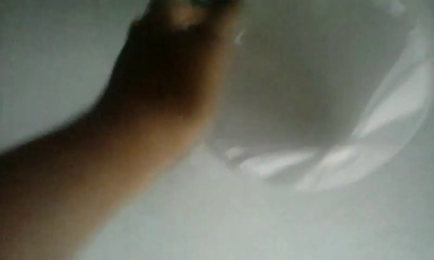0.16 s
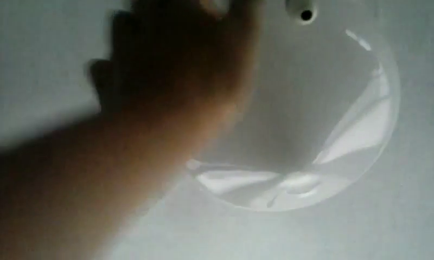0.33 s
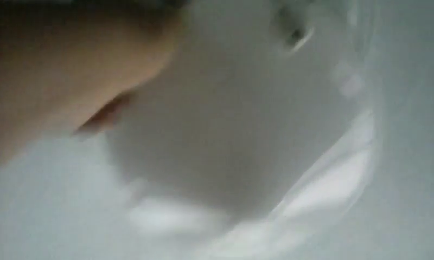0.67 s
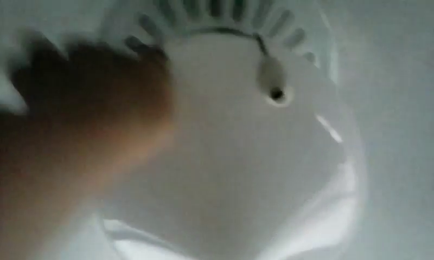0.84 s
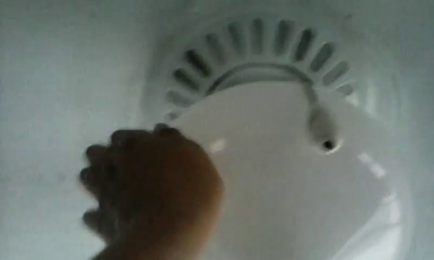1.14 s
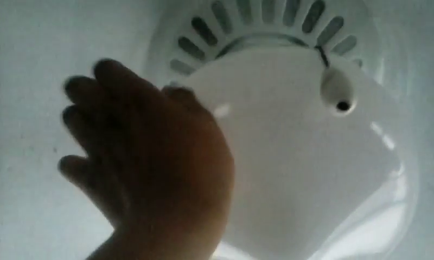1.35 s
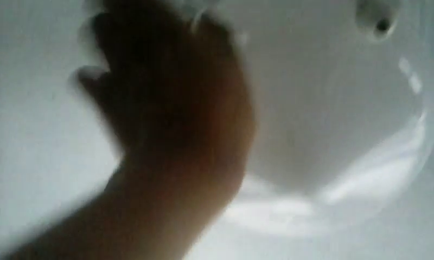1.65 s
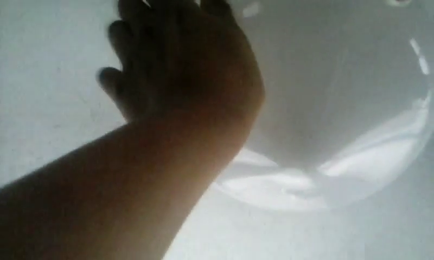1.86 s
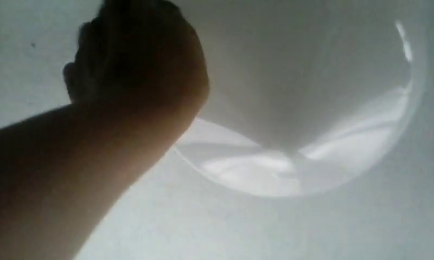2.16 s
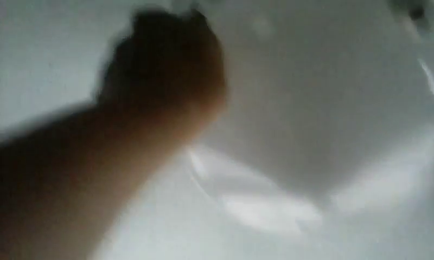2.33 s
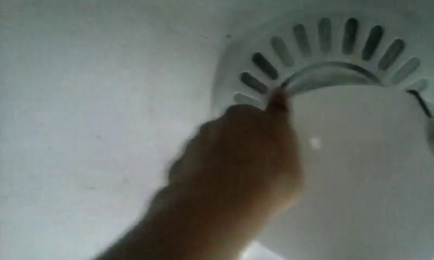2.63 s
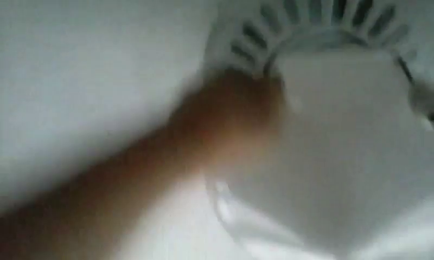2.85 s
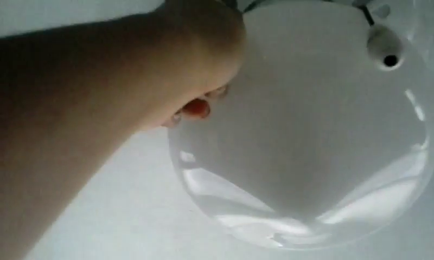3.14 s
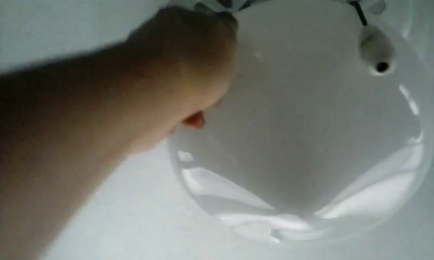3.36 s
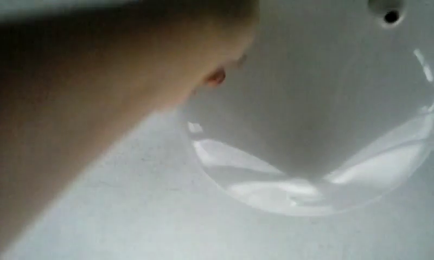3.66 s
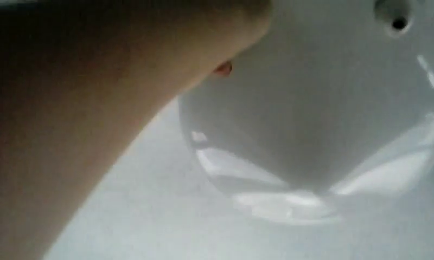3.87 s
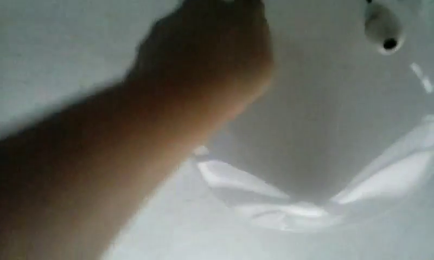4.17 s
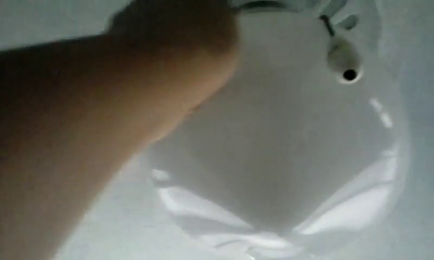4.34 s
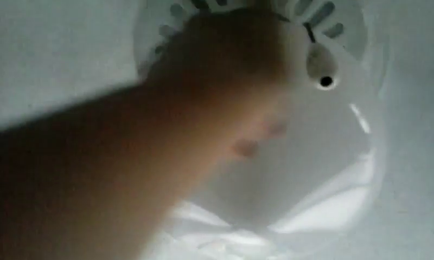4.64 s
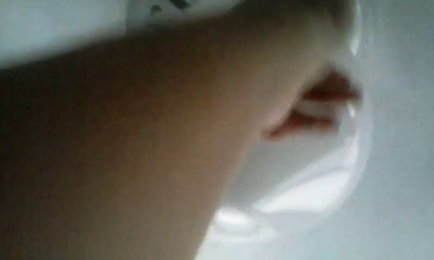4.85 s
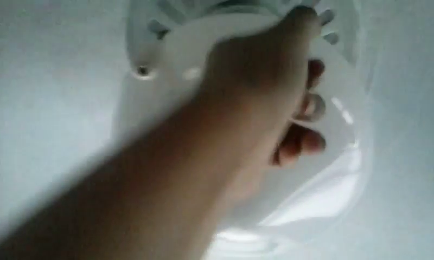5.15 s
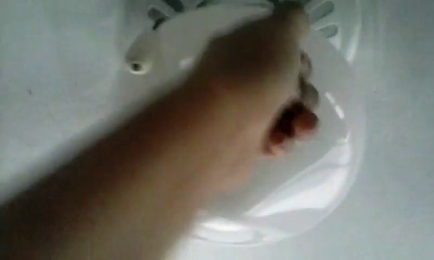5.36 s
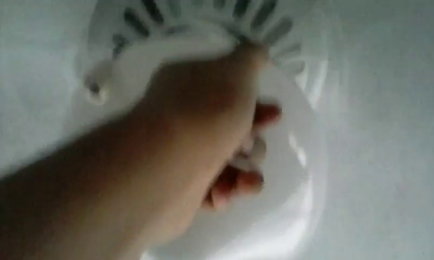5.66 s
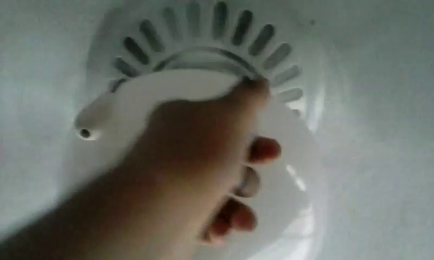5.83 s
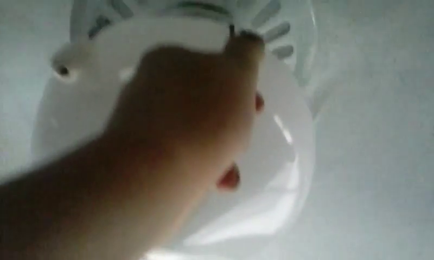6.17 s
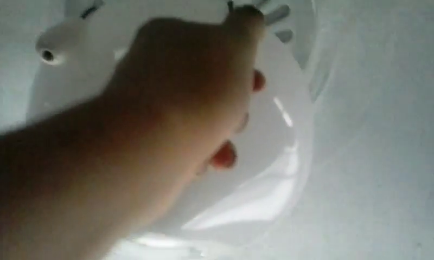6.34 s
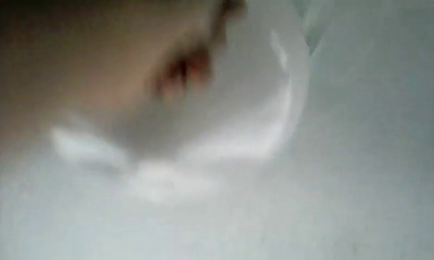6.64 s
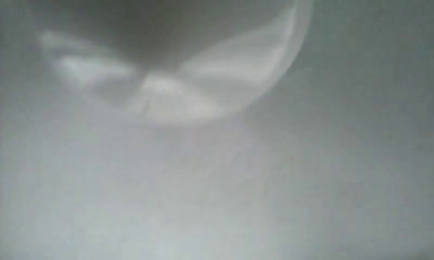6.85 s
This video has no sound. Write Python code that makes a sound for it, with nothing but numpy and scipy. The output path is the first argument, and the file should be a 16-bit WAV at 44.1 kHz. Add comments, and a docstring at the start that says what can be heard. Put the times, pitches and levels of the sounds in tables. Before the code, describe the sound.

Shrill clinks and clicks come as a hand tugs bead chains against a glass light globe, jolting the ceiling fan, which hums briefly.

```python
"""In a small room, a hand works the pull chains of a ceiling fan light. Pendants clink on the glass globe and
the switch clicks in its metal cup: each impact is a crack followed by the free vibration of the body struck,
and the blows and the bead hiss are shrill around 8 kHz. The pulls jolt the housing into a low shudder, the bead
chains rustle and squeak on the glass, and the motor hums for a moment while it has power. Under it all lie a
soft, wavering background noise and a low rumble."""
import sys
import numpy as np
from scipy import signal
from scipy.fft import rfft, irfft
from scipy.io import wavfile

SR = 44100
rng = np.random.default_rng(int(sys.argv[2]) if len(sys.argv) > 2 else 0)


def wrap_up_sound(samples):
    """Save the sound to the file named by the first command line argument, as 16-bit audio."""
    columns = np.atleast_2d(samples).T
    # keep every value between -1 and 1, then stretch to whole-number steps
    tamed = np.clip(columns, -1, 1)
    steps = np.round(tamed * 32767).astype(np.int16)
    wavfile.write(sys.argv[1], SR, steps)


N = 308700
TIME = np.arange(N) / SR
SIZE = 32768   # samples in one impact and its decay
AGE = np.arange(SIZE) / SR   # time since the impact [s]
FREQ = np.maximum(np.fft.rfftfreq(SIZE, 1 / SR), 1)


def globe_clinks():
    """Impact excitation: pendants and chain strike the globe and ring its lightly damped glass modes."""
    # impacts: (time [s], level [dB], extra crack [dB], weight [dB], hardness [dB])
    hits = [(0.5065, -8.5, 0, -5.5, -34), (0.559, -18, -12, -1, -10), (0.576, -25, 9.5, 11.5, -22),
            (0.7355, -26, 6, 0.5, -10), (0.954, -43, 0, -12, -23), (0.971, -30, -7, -4, -32),
            (0.99, -32.5, -8, -8, -12), (1.288, -40.5, 7, -11, -28), (1.768, -26, -12, -2, -16),
            (2.397, -32.5, 7, -14.5, -17), (2.58, -48.5, 13, -3, 0), (3.491, -22.5, -16, 19, -11.5),
            (3.875, -17.5, 8, -6, -18.5), (4.065, -36.5, -5, 7.5, -5), (4.683, -32, -3, 7.5, -10),
            (4.719, -25, 2.5, 3, -16.5), (5.032, -30.5, -17, 4.5, -16), (6.006, -39, 1, -23, -10)]
    # modes of the globe: (frequency [Hz], level [dB], t60 [s])
    glass_modes = [(2428, -5, .75), (2644, -17, .35), (3080, -1, .32), (3390, -9, .22), (3472, -5, .28),
                   (4790, -11, .22), (5550, -6, .22), (5669, -6, .2), (6126, -6, .19), (6611, -3, .24),
                   (6799, -4, .23), (7197, -1, .2), (7440, 0, .22), (7648, -2, .3), (7916, -3, .32),
                   (8148, -1, .24), (8335, -3, .22), (8590, -2, .2), (8952, 0, .22), (9453, -2, .25),
                   (10100, -2, .22), (10720, -1, .2), (11400, -3, .2), (12210, -3, .2)]
    # bands under 6.8 kHz, low to high: (level re the 8 kHz band [dB], gain with weight [dB/dB])
    low_bands = [(-37.5, 1.3), (-23.5, 1.0), (-12.5, 0.69)]
    return impacts(hits, glass_modes, low_bands, crack_db=15, ring_db=23, modes_db=1,
                   crack_t60=0.014, ripple_db=4, spread_db=6, grain_db=2.5)


def switch_clicks():
    """Impact excitation: the ratchet and the chain snapping through its guide ring the metal switch cup."""
    # impacts: (time [s], level [dB], extra crack [dB], weight [dB], hardness [dB])
    hits = [(1.886, -26.5, -1.5, 0, -7), (2.797, -28, -5, -1, -21), (2.8252, -20.5, -2, 4.5, -16),
            (2.839, -14.5, -3.5, 4.5, -15), (2.918, -25, -0.5, -1.5, -11.5), (2.969, -21, 3, 1, -25),
            (3.057, -23.5, 2, -1.5, -18.5), (3.103, -23.5, -0.5, 0.5, -26), (3.1655, -14.5, 1.5, 1.5, -7.5),
            (3.527, -21, -2, 6, -22), (3.5435, -15, 2, 1.5, -17.5), (3.662, -25.5, 2, -2, -24),
            (3.675, -31.5, 5.5, -0.5, -14), (3.711, -32, 9, -5, -40), (3.7225, -15, -16, 0, -23),
            (3.751, -26.5, -2.5, -4, -21), (3.781, -15.5, 2.5, -0.5, -6.5), (4.095, -20, -1, -0.5, -35),
            (4.111, -22.5, -4, 8.5, -6.5), (4.126, -15.5, 1.5, 4, -17.5), (4.2605, -29.5, 4, -17, -26),
            (4.3295, -21.5, -0.5, -3, -22), (4.375, -21, 1, -3.5, -22), (4.4485, -17, 3, -0.5, -14.5),
            (4.549, -30, 0, -7.5, -29), (4.5935, -41.5, -5, 4, -3.5), (5.35, -20, -1.5, -5, -14),
            (5.372, -10.5, 1, -6, -19.5), (5.636, -23.5, 0, -3.5, -6), (5.67, -20, 2.5, -2, -9)]
    # modes of the cup: (frequency [Hz], level [dB], t60 [s])
    cup_modes = [(732, -5, .22), (1620, -5, .18), (1800, -2, .24), (1900, -4, .18), (2213, -4, .26),
                 (2460, -8, .2), (2644, -7, .2), (2750, -7, .2), (3074, -4, .25), (3390, -4, .2),
                 (3910, -4, .22), (4100, -5, .18), (4440, -3, .14), (4750, -5, .18), (5148, -5, .2),
                 (5390, -4, .2), (5544, 0, .22), (5675, -3, .22), (6525, -3, .22), (6799, 2, .23),
                 (7203, -3, .2), (7433, -2, .2), (7650, -2, .2), (7914, -1, .24), (8143, -1, .22),
                 (8335, -3, .2), (8619, -3, .12), (9300, -3, .16), (10500, -4, .16), (12200, -2, .2)]
    # bands under 6.8 kHz, low to high: (level re the 8 kHz band [dB], gain with weight [dB/dB])
    low_bands = [(-20.5, 1.28), (-14, 0.74), (-6.5, 0.32)]
    return impacts(hits, cup_modes, low_bands, crack_db=23, ring_db=24.5, modes_db=-7,
                   crack_t60=0.042, ripple_db=4.5, spread_db=6.5, grain_db=0.56)


def impacts(hits, body_modes, low_bands, crack_db, ring_db, modes_db, crack_t60,
            ripple_db, spread_db, grain_db, detune=0.0013, split=0.00462):
    """Superposition of crack, damped modes and reverberation; weight lifts the lows, hardness the top."""
    out = np.zeros(N)
    modes = np.array([from_db(db) * np.exp(2j * np.pi * hz * AGE) * decay(t60)
                      for hz, db, t60 in body_modes])
    for s, db, snap_db, weight, hardness in hits:
        # where the body is struck decides how strongly each mode answers
        strengths = from_db(rng.normal(0, spread_db, len(modes)))
        phases = np.exp(2j * np.pi * rng.random(len(modes)))
        ringing = (strengths * phases) @ modes
        # a round shell has twin modes; the changing grip splits them, so they beat
        twins = unit(detuned(ringing.real, detune) + detuned(ringing.imag, split))
        tail = unit(room_tail(grain_db) + from_db(modes_db) * twins)
        blow = from_db(db) * (from_db(crack_db + snap_db) * crack(crack_t60) + from_db(ring_db) * tail)
        band_db = np.array([0, *(usual + slope * weight for usual, slope in low_bands), hardness])
        add(out, s, irfft(rfft(blow) * contact_filter(band_db, ripple_db)))
    return out


def crack(t60, rise_s=0.0004, snap=1.44, snap_t60=0.002):
    """Contact transient: a snap, then a brief chatter of beads on metal."""
    envelope = (decay(t60) + snap * decay(snap_t60)) * rise(rise_s)
    return unit(chatter(grain_db=-1) * envelope)


def contact_filter(band_db, ripple_db):
    """Spectral shaping: a contact's spectrum, rippled by the spot struck, is bent to a level per band."""
    # the 8 kHz band, then the others from low to high: (lower edge [Hz], upper edge [Hz])
    bands = [(6800, 9500), (600, 2200), (2200, 5000), (5000, 6800), (10000, 15800)]
    # spectrum common to every contact: (frequency [Hz], spectral density [dB])
    contact_spectrum = [(150, -40.5), (450, -22), (720, -11.5), (950, -23), (1700, -15.5), (3200, -16),
                        (4700, -16), (5700, -12), (7000, -3.5), (8100, 3.5), (8800, -4.5), (10500, -12),
                        (13000, -18), (16000, -18)]
    centres = np.sqrt(np.prod(bands, axis=1))
    ripple_hz = np.linspace(0, SR / 2, 110)
    ripple = np.interp(FREQ, ripple_hz, rng.standard_normal(len(ripple_hz)))
    shape_db = at_hz(contact_spectrum, FREQ) + ripple_db * ripple
    for _ in range(2):
        power = 10 ** (shape_db / 10) / len(FREQ)
        band_power = np.array([power[(FREQ > low) & (FREQ < high)].sum() for low, high in bands])
        shortfall_db = band_db - 10 * np.log10(band_power)
        shape_db = shape_db + at_hz(sorted(zip(centres, shortfall_db)), FREQ)
    return minimum_phase(shape_db)


def fixture_pings(split_hz=21, rise_s=0.002, wet=0.54):
    """Beating: the spot struck favours a range of partials, and each interferes with a close twin."""
    # blows: (time [s], level [dB], favoured frequency [Hz], reach around it [Hz])
    blows = [(0.5074, -51, 3340, 700), (0.575, -40, 3130, 560), (0.7361, -49, 2970, 650),
             (1.77, -53.5, 3000, 700), (1.886, -41.5, 2200, 110), (2.969, -37, 3470, 90),
             (3.1675, -29, 3920, 150), (3.491, -29, 3390, 90), (3.675, -37, 3400, 90),
             (3.875, -41, 3310, 90), (4.717, -55, 2750, 180), (5.034, -56.5, 2950, 200),
             (5.372, -35, 2250, 80), (5.636, -38, 4400, 200), (5.67, -41, 2260, 80)]
    # partials of the fixture: (frequency [Hz], level [dB], t60 [s])
    partials = [(2280, -4, .19), (2330, -4, 0.2), (2420, 4, 0.42), (2675, -6.5, .14), (3050, 2.5, 0.18),
                (3391, 5, 0.1), (3510, -3.5, 0.21), (3914, -3, 0.13), (4340, -2.5, 0.28)]
    out = np.zeros(N)
    for s, db, favoured_hz, reach_hz in blows:
        tone = 0
        for hz, partial_db, t60 in partials:
            twin = np.sin(2 * np.pi * ((hz + split_hz) * AGE + rng.random()))
            pair = np.sin(2 * np.pi * hz * AGE) + twin
            tone += from_db(db + partial_db) * gaussian(hz, favoured_hz, reach_hz) * pair * decay(t60)
        add(out, s, in_room(tone * rise(rise_s), wet))
    return out


def housing_jolts(cycles_to_peak=4.28, shake=0.39, rattle_db=-20, shell_rise_s=0.027):
    """Damped oscillation: the hanging body shudders, its shell rings, loose parts rattle on each swing."""
    # jolts: (time [s], level [dB], shudder frequency [Hz], shell gain [dB])
    jolts = [(1.893, -44, 94.3, -1), (2.829, -29, 102.3, 4), (2.961, -40.5, 75.7, 9),
             (3.528, -29.5, 107, 5), (3.682, -41.5, 77, 6), (4.101, -29, 98, 4.5), (4.252, -45, 77.7, 4.5),
             (5.352, -36, 94.3, 12), (5.525, -46, 85.5, 3.5), (5.656, -52.5, 84.4, 17.5),
             (5.971, -48, 84, -1)]
    # modes of the shell: (frequency [Hz], relative level [dB], t60 [s])
    shell_modes = [(142, -13.5, 0.17), (221.9, -6.5, 0.26), (233, -20, 0.35), (441, -33, 0.04),
                   (786, -23.5, 0.34)]
    out = np.zeros(N)
    for s, db, shudder_hz, shell_db in jolts:
        peak_s = cycles_to_peak / shudder_hz
        swell = (AGE / peak_s) ** 2 * np.exp(2 * (1 - AGE / peak_s))
        shudder = np.sqrt(2) * np.sin(2 * np.pi * shudder_hz * AGE)
        wobble = in_band(rng.standard_normal(SIZE), 63, 165)
        rattle = in_band(chatter(grain_db=10) * np.maximum(shudder, 0), 550, 5000)
        shell = sum(from_db(level + shell_db) * np.sin(2 * np.pi * (hz * AGE + rng.random())) * decay(t60)
                    for hz, level, t60 in shell_modes)
        swinging = shudder + shake * wobble + from_db(rattle_db) * rattle * decay(t60=0.53)
        add(out, s, from_db(db) * (swell * swinging + 2 * shell * rise(shell_rise_s)))
    return out


def hand_knocks(wet=0.39):
    """Heavy damping: each soft blow of the hand on the fixture rings a broad resonance for a few cycles."""
    # knocks: (time [s], level [dB], frequency [Hz], bandwidth [Hz])
    knocks = [(1.888, -36, 1160, 348), (5.37, -26.5, 446, 111), (5.369, -27.5, 1150, 300),
              (5.637, -41.5, 840, 150), (5.673, -45.5, 1110, 400), (5.942, -41.5, 1020, 397)]
    out = np.zeros(N)
    for s, db, hz, width_hz in knocks:
        time_constants = np.pi * width_hz * AGE
        envelope = time_constants * np.exp(1 - time_constants)
        pulse = from_db(db) * envelope * np.sin(2 * np.pi * hz * AGE)
        add(out, s, in_room(pulse, wet))
    return out


def glass_squeaks():
    """Friction: skin and beads rub the glass, each rub a swell of noise in one narrow resonance."""
    # rubs: (time [s], level [dB], half-width [s], frequency [Hz], bandwidth [Hz])
    rubs = [(0.102, -64.5, 0.058, 1880, 400), (0.735, -45.5, .007, 3080, 200), (2.33, -63, 0.022, 2973, 70),
            (2.643, -71, 0.023, 1900, 600), (6.957, -67.5, 0.043, 2446, 61)]
    out = np.zeros(N)
    for s, db, width_s, hz, width_hz in rubs:
        resonance = in_band(rng.standard_normal(N), hz - width_hz / 2, hz + width_hz / 2)
        out += from_db(db) * gaussian(TIME, s, width_s) * resonance
    return out


def chain_rustle(ticks_per_s=260, spread_db=5, hiss=0.84, beads_db=3, singing_db=-16, rubbing_db=4):
    """Shot noise: random bead collisions blur into a hiss; friction scrapes the rim and rings the globe."""
    # stirring of the hanging chains: (time [s], relative level [dB])
    stirring = [(0, -57.5), (1.1, -56.5), (1.5, -63), (2.05, -55), (2.35, -65), (2.55, -56), (3.4, -63),
                (4.9, -58.5), (5.2, -65), (5.7, -72), (6.35, -69), (6.7, -62), (7, -68.5)]
    # slides through the fingers: (time [s], relative hiss [dB], half-width [s], relative singing [dB])
    slides = [(.15, -73, 0.023, -77), (0.417, -50.5, .022, -85), (1.25, -54.5, .012, -78),
              (1.377, -53.5, 0.029, -69), (1.571, -51.5, 0.022, -72), (2.138, -58, 0.048, -76),
              (2.688, -58.5, 0.044, -92), (4.913, -68.5, 0.011, -78), (5.24, -58, 0.0035, -70),
              (5.331, -58.5, 0.036, -80), (6.055, -57, 0.1, -71.5), (6.272, -57.5, 0.011, -73.5),
              (6.572, -54, 0.096, -66)]
    # drags over the rim: (time [s], level [dB], half-width [s])
    drags = [(0.418, -48.5, 0.021), (6.561, -52, 0.056)]
    # spectra of beads, scraped rim and rubbed globe: (frequency [Hz], spectral density [dB])
    bead_spectrum = [(2060, -52), (3500, -34.5), (4360, -41), (5240, -31), (6330, -16.5), (7650, -1),
                     (7950, 4), (8200, 0.5), (9420, -6), (11300, -15.5), (14300, -21.5), (15800, -23)]
    rim_spectrum = [(2000, -11.5), (2550, -5.5), (3600, -22), (4800, -3), (5400, -0.5), (7500, 14.5),
                    (9000, -12), (15000, -29)]
    globe_spectrum = [(500, -26), (1000, -1), (1700, -8), (2150, -11), (2440, 4.5), (2650, 8.5),
                      (2900, -15.5), (3100, -6.5), (3600, -23.5), (5000, -34)]
    restless = from_db(in_time(stirring)[0])
    sliding = swells([(s, db, width_s) for s, db, width_s, _ in slides])
    rubbing = swells([(s, db + rubbing_db, width_s) for s, _, width_s, db in slides])
    collisions = (rng.random(N) < ticks_per_s / SR) * rng.choice([-1, 1], N)
    strengths = from_db(spread_db * np.minimum(rng.exponential(1, N), 4))
    ticks = in_room(collisions * strengths, wet=1.4)
    rustle = coloured(ticks, bead_spectrum) + hiss * noise(bead_spectrum)
    beads = from_db(beads_db) * np.hypot(restless, sliding) * rustle
    singing = np.hypot(from_db(singing_db) * restless, rubbing) * coloured(ticks, globe_spectrum)
    return beads + swells(drags) * noise(rim_spectrum) + singing


def motor_hum(hum_hz=120, octave_db=-19, rumble_db=-4.5):
    """Forced vibration: the windings buzz at twice the mains frequency and the turning rotor rumbles."""
    # course of the hum: (time [s], level [dB])
    course = [(2.82, -90), (2.88, -45.5), (3.4, -50), (4.1, -45.5), (4.2, -39), (4.4, -100)]
    level_db, = in_time(course)
    phase = 2 * np.pi * hum_hz * TIME
    buzz = np.sqrt(2) * (np.sin(phase) + from_db(octave_db) * np.sin(2 * phase))
    rumble = from_db(rumble_db) * in_band(rng.standard_normal(N), 60, 133)
    return from_db(level_db) * (buzz + rumble)


def background(rumble_gain_db=4.5, waver_db=3, wavers_per_s=14):
    """Modulated noise: soft, low and wavering, it dips now and then and grows quieter, over a rumble."""
    # course of the background: (time [s], noise level [dB], relative rumble level [dB])
    course = [(0, -52.5, -57.5), (1.45, -54, -64), (1.95, -53, -53), (2.35, -55.5, -67.5),
              (2.75, -53.5, -56.5), (4.7, -64.5, -66), (5.6, -62.5, -57), (6.3, -69.5, -65),
              (7, -67.5, -67)]
    # spectra of the soft noise and the rumble: (frequency [Hz], spectral density [dB])
    soft_spectrum = [(100, -36), (170, -3), (195, -9.5), (230, 4.5), (286, -5), (403, 0.5), (516, -7),
                     (660, -9), (1190, -23.5), (1820, -24), (2300, -29), (2980, -24), (3240, -49),
                     (4500, -45), (5850, -55), (9900, -120)]
    rumble_spectrum = [(20, -41), (35, -20), (55, -4), (85, 0.5), (130, -6.5), (190, -18), (400, -37)]
    soft_db, rumble_db = in_time(course)
    waver = np.interp(TIME * wavers_per_s, np.arange(400), rng.standard_normal(400))
    soft_noise = from_db(soft_db + waver_db * waver) * noise(soft_spectrum)
    return soft_noise + from_db(rumble_db + rumble_gain_db) * noise(rumble_spectrum)


def room_tail(grain_db=0.5, build_s=0.0046):
    """Reverberation: uneven reflections build up quickly and last longest in the midrange."""
    # reverberation times: (frequency [Hz], t60 [s])
    decay_times = [(300, 0.29), (1500, 0.43), (5000, 0.28), (8000, 0.32), (13000, 0.35)]
    centres, t60s = np.transpose(decay_times)
    white, tail = rfft(chatter(grain_db)), 0
    for t60, one_band in zip(t60s, np.eye(len(centres))):
        tail += irfft(white * np.interp(FREQ, centres, one_band)) * decay(t60)
    return unit(tail * rise(build_s))


def in_room(x, wet):
    """Convolution: the direct sound plus its reflections."""
    return x + wet * signal.fftconvolve(x, room_tail())[:len(x)]


def chatter(grain_db, clump=32):
    """Amplitude-modulated noise, in clumps shorter than a millisecond."""
    white = rng.standard_normal(SIZE)
    return white * from_db(grain_db * np.repeat(rng.standard_normal(SIZE // clump), clump))


def minimum_phase(db):
    """Causal response with the given magnitude: nothing sounds before the blow."""
    cepstrum = irfft(np.log(from_db(db)))
    cepstrum[1:SIZE // 2] *= 2
    cepstrum[SIZE // 2 + 1:] = 0
    return np.exp(rfft(cepstrum))


def detuned(x, spread):
    """Resampling shifts a ringing to a slightly different random pitch."""
    return np.interp(AGE * (1 + spread * rng.standard_normal()), AGE, x)


def noise(spectrum):
    """Gaussian noise with the given spectrum; rms 1."""
    return coloured(rng.standard_normal(N), spectrum)


def coloured(x, spectrum):
    """Filter a scene-long signal by a spectrum; rms 1."""
    gain = from_db(at_hz(spectrum, np.fft.rfftfreq(N, 1 / SR)))
    return unit(irfft(rfft(x) * gain, N)) * np.sqrt(N)


def in_band(x, low_hz, high_hz):
    """Band-pass filter; rms 1."""
    band_pass = signal.butter(2, [low_hz, high_hz], "band", fs=SR, output="sos")
    return unit(signal.sosfilt(band_pass, x)) * np.sqrt(len(x))


def swells(rows):
    """Envelope of smooth swells, each with its time, level and half-width."""
    return sum(from_db(db) * gaussian(TIME, s, width_s) for s, db, width_s in rows)


def gaussian(x, centre, width):
    """Bell curve of height 1; width is its standard deviation."""
    return np.exp(-0.5 * ((x - centre) / width) ** 2)


def decay(t60):
    """Exponential decay, 60 dB in t60 seconds."""
    return np.exp(-np.log(1000) * AGE / t60)


def rise(seconds):
    """Exponential approach to 1."""
    return 1 - np.exp(-AGE / seconds)


def at_hz(points, hz):
    """Read a spectrum on a log-frequency axis."""
    f, value = np.transpose(points)
    return np.interp(np.log(np.maximum(hz, 1)), np.log(f), value)


def in_time(rows):
    """One curve per level column, at every sample."""
    s, *columns = np.transpose(rows)
    return [np.interp(TIME, s, column) for column in columns]


def from_db(db):
    """Decibels to gain."""
    return 10 ** (np.asarray(db) / 20)


def unit(x):
    """Scale to unit energy."""
    return x / np.sqrt(np.sum(x ** 2) + 1e-20)


def add(out, s, sound):
    """Mix a sound in at time s."""
    start = max(int(s * SR), 0)
    out[start:start + len(sound)] += sound[:N - start]


def scene():
    """Superposition: all sources sum at one point, an arm's length away."""
    blows = globe_clinks() + switch_clicks() + fixture_pings() + housing_jolts() + hand_knocks()
    return (blows + glass_squeaks() + chain_rustle() + motor_hum() + background())[None]


def record(dry):
    """Soft saturation rounds the highest peaks; a steep low-pass cuts the top."""
    cutoff_hz = 15850
    rounded = 1.568 * np.tanh(dry / 1.616)
    return signal.sosfilt(signal.ellip(10, 0.3, 70, cutoff_hz, fs=SR, output="sos"), rounded)


dry = scene()
out = record(dry)
wrap_up_sound(out)
```